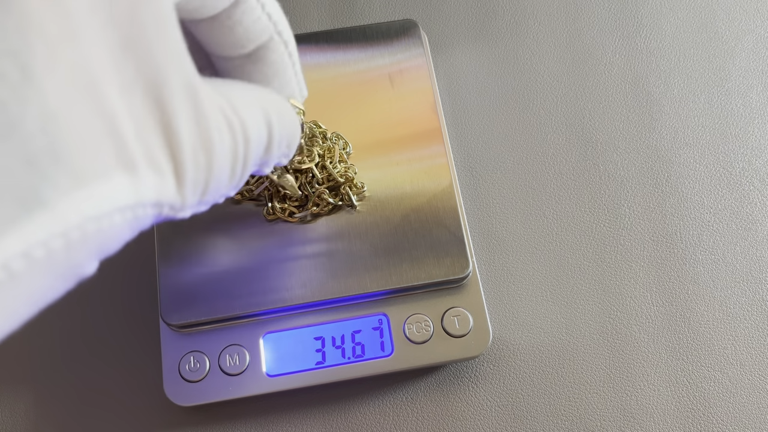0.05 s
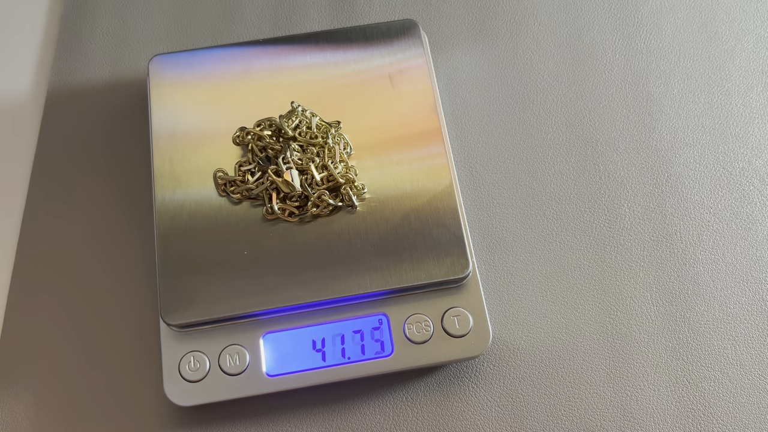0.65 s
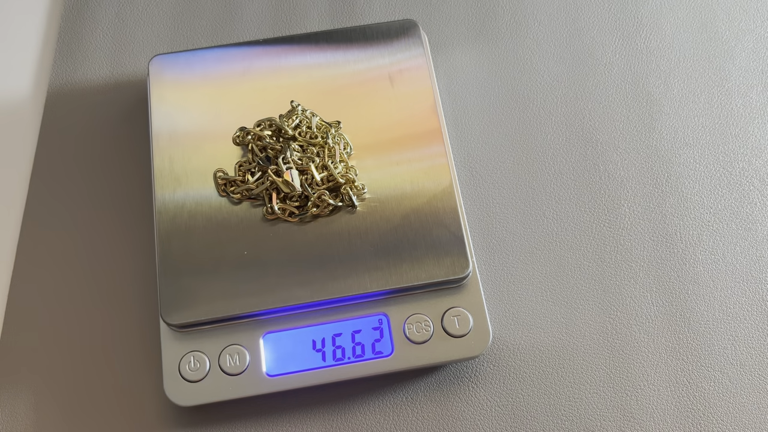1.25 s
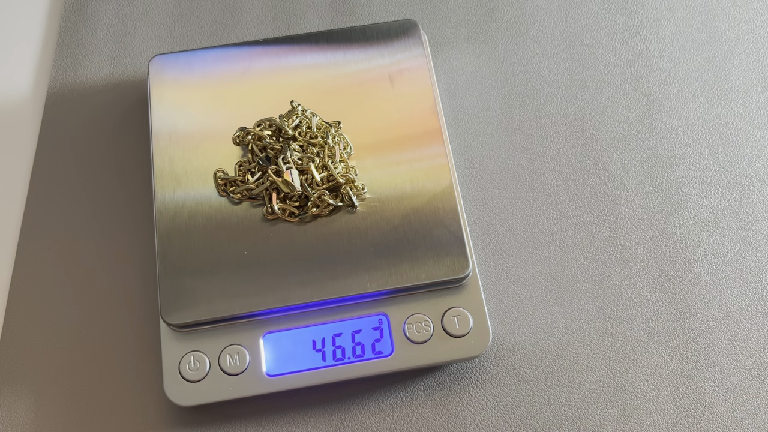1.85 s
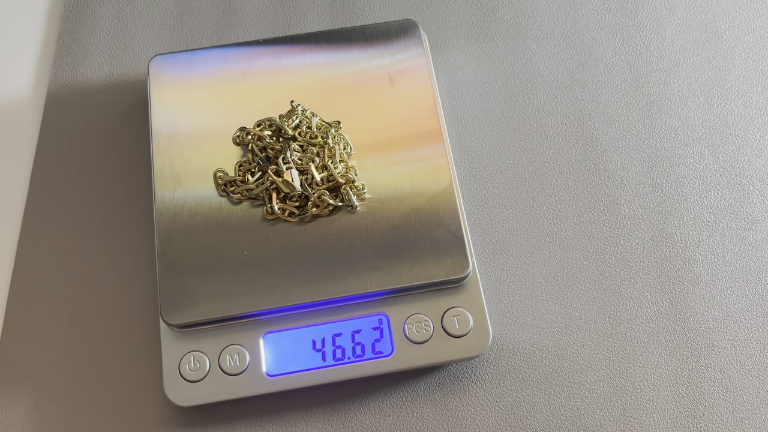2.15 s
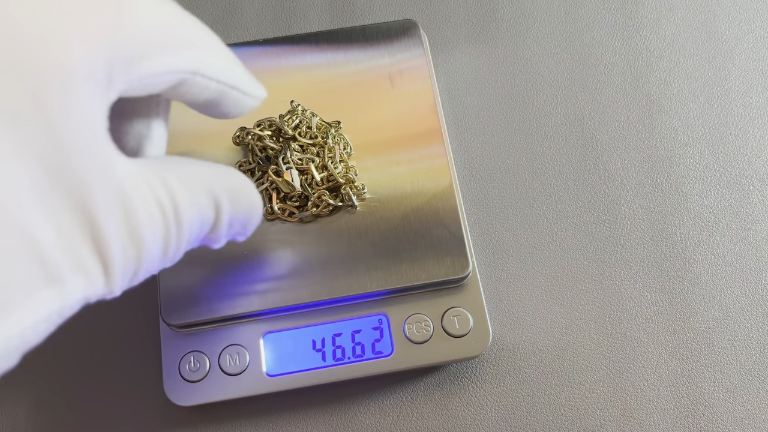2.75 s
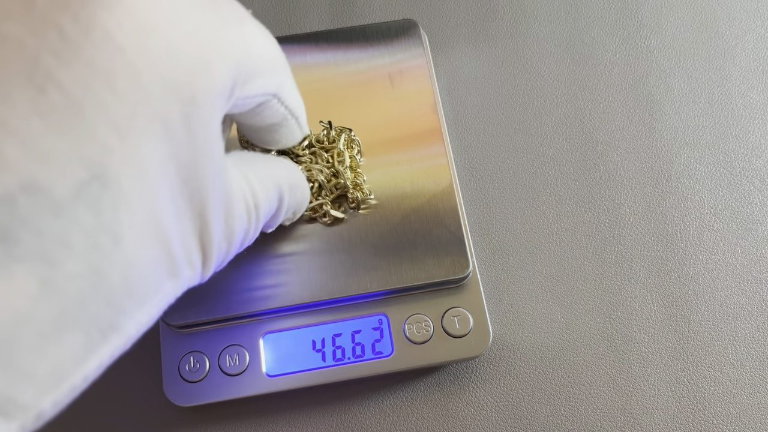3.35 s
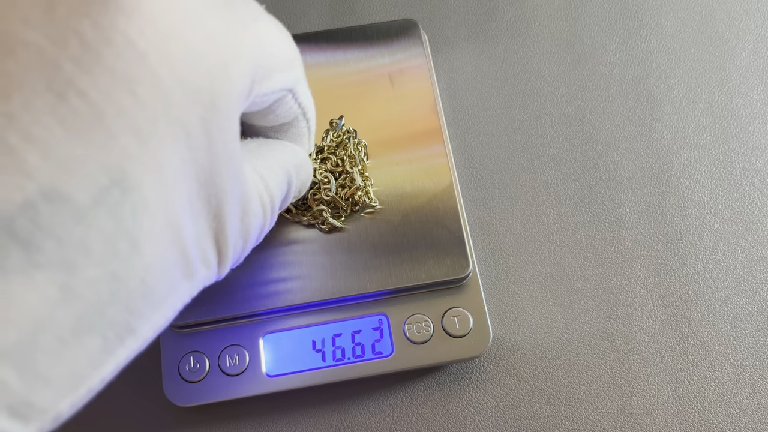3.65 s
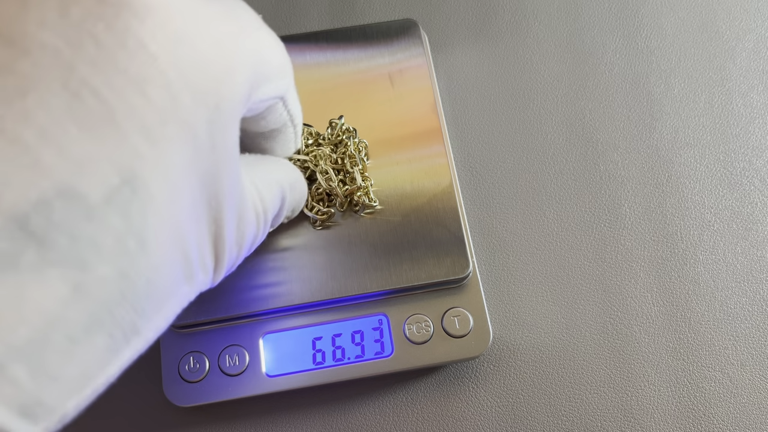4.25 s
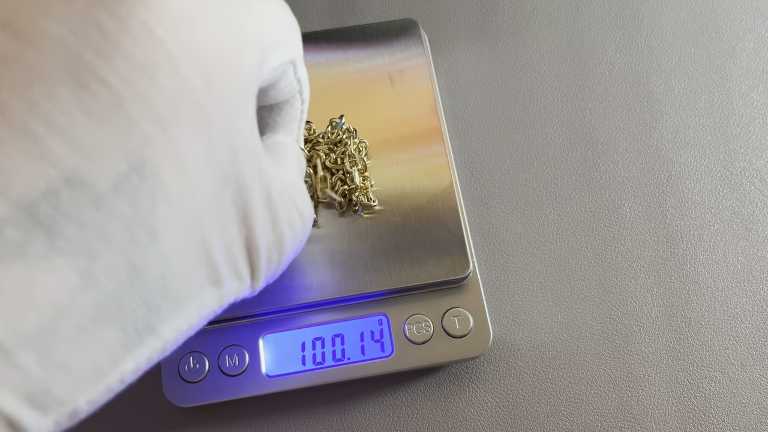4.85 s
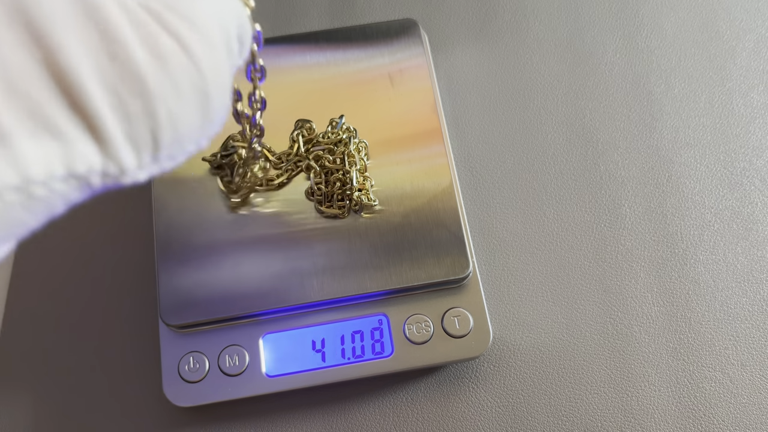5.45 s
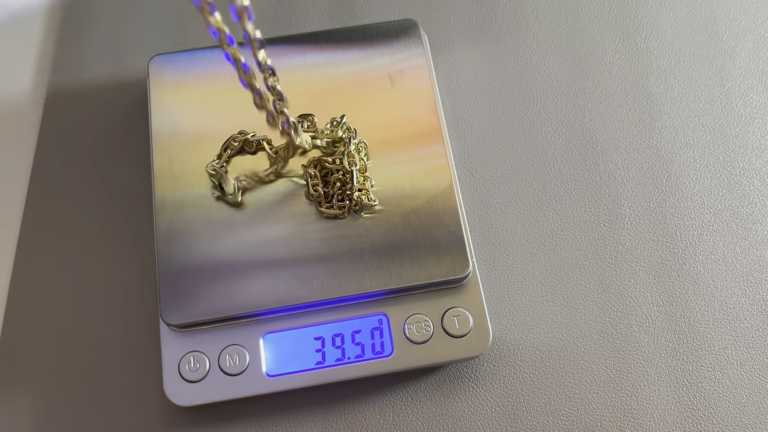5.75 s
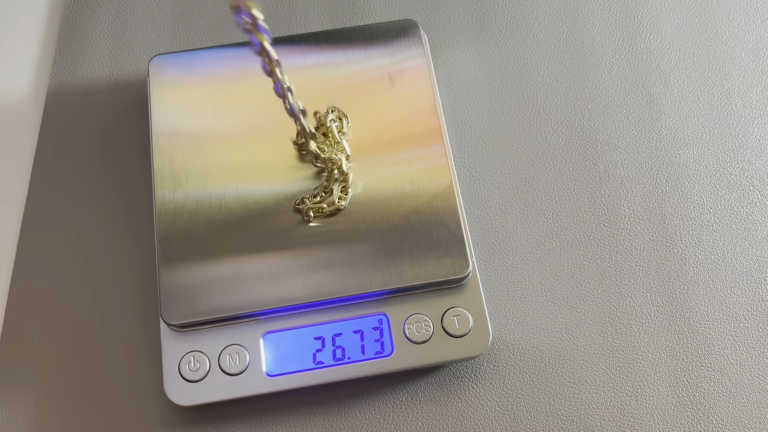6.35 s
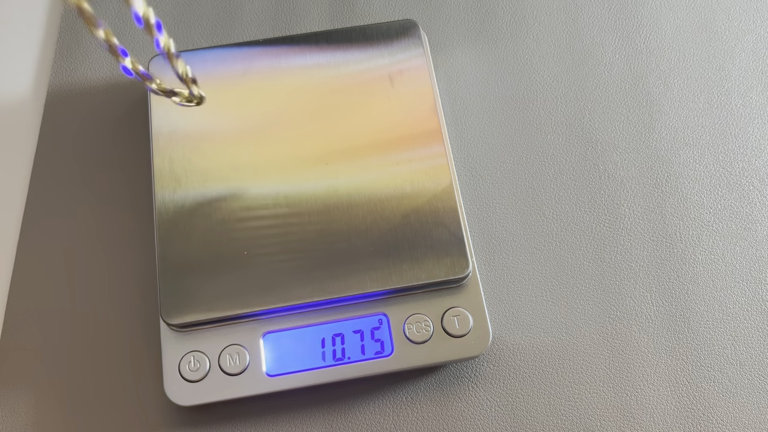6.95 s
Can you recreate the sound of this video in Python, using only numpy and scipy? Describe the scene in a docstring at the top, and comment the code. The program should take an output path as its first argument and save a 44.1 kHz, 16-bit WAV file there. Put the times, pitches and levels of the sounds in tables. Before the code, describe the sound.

A heavy metal chain clinks and rattles on a small steel scale, rests, then is gathered up and lifted off.

```python
"""A heavy metal chain clatters onto the steel platter of a small scale, dropped by a gloved hand.
After a pause the hand gathers it up and lifts it off. Colliding links tick and chatter, and their
impacts excite a few damped resonances of the thin platter. The desk, the hand and a small room
reflect the sound to a close pair of microphone ports, over the low hum of a machine."""
import sys
import numpy as np
from scipy import signal
from scipy.fft import rfft, irfft, next_fast_len
from scipy.io import wavfile
from scipy.ndimage import uniform_filter1d

SR = 44100
rng = np.random.default_rng(int(sys.argv[2]) if len(sys.argv) > 2 else 0)


def waveform_to_disk(signal):
    """Save audio, clipped to [-1, 1], as 16-bit WAV at the path in sys.argv[1]."""
    frames = np.transpose(np.atleast_2d(signal))
    scaled = np.clip(frames, -1, 1) * 32767
    samples = np.round(scaled).astype(np.int16)
    wavfile.write(sys.argv[1], SR, samples)


N = 317961


def hard_knocks():
    """Impact excitation: clumps of links land hard on the heap and the platter."""
    # landings, levels before the trims: (time [s], clang [dB], thud [dB], tick [dB])
    landings = [(0.103, -49.5, -61, -61), (0.2154, -35.5, -43.5, -41.5), (0.261, -28, -45, -34.5),
                (0.2936, -30, -40, -37), (0.3288, -20.5, -27, -28.5), (0.3437, -19.5, -27.5, -31.5),
                (0.376, -21, -29.5, -32), (0.3982, -21, -34, -31), (0.4437, -33.5, -45, -38.5),
                (0.4733, -46, -50, -47), (0.5175, -34.5, -43, -39), (0.5305, -30, -43, -35),
                (0.6833, -53, -61, -64), (3.0804, -55, -55, -54), (3.253, -54, -49, -47),
                (3.4028, -43, -46, -38), (3.5254, -33.5, -46, -45.5), (3.6686, -57, -74, -63.5),
                (3.7466, -27.5, -42.5, -36), (3.7868, -25, -42, -31.5), (3.8138, -31, -50.5, -37.5),
                (4.0531, -45, -48, -41.5), (4.0873, -34, -63, -35.5), (4.139, -33, -52, -36.5),
                (4.1634, -36, -40.5, -37), (4.259, -15, -35, -27.5), (4.505, -33, -45.5, -36.5),
                (4.5505, -28.5, -45, -41), (4.573, -24, -37.5, -36), (4.82, -21, -32.5, -38),
                (4.9108, -21.5, -34, -39.5), (4.961, -28.5, -45, -36.5), (4.9974, -29, -30.5, -33.5),
                (5.0195, -16.5, -26, -37), (5.035, -9.5, -28, -30.5), (5.1211, -18.5, -29.5, -36),
                (5.1635, -22, -30, -34), (5.1962, -26.5, -38, -38), (5.2716, -35, -52, -42),
                (5.3168, -32.5, -51, -48.5), (5.3835, -41, -48, -41.5), (5.4293, -30, -44, -43.5),
                (5.4916, -33.5, -42.5, -43), (5.53, -23, -32.5, -43), (5.5422, -30, -38, -37),
                (5.5648, -17.5, -24.5, -36), (5.5804, -28, -40, -42), (5.6307, -29, -38, -34.5),
                (5.6373, -26.5, -33.5, -39), (5.6675, -31, -37, -40), (5.6853, -23, -27, -43),
                (5.7684, -36.5, -34, -45.5), (5.7857, -25, -30.5, -37), (5.8217, -31, -37, -38),
                (5.894, -26, -35.5, -53.5), (5.9277, -20.5, -27.5, -33), (5.9494, -32, -33, -36),
                (6.0472, -25, -31.5, -37.5), (6.0917, -29.5, -36.5, -42), (6.1191, -23.5, -30, -34.5),
                (6.1722, -34.5, -34.5, -37), (6.2025, -29.5, -37.5, -34), (6.336, -29.5, -35, -35),
                (6.3865, -29, -25.5, -26), (6.4228, -15.5, -29, -32), (6.4714, -27.5, -41, -39),
                (6.52, -25.5, -39, -34), (6.5322, -27.5, -29.5, -29), (6.5957, -32, -38, -30),
                (6.668, -42, -39, -36)]
    return impacts(landings, rise_s=0.0011, clang_db=13.5, thud_db=19.5, tick_db=26.5)


def light_knocks(per_s=38, over_rubbing_db=15.5, spread_db=3.5, count=600):
    """Random impacts: single links land with a strength that follows the chain's motion."""
    when, chance = rng.random((count, 2)).T
    times = when * N / SR
    levels = motion_db(times)[:, None] + over_rubbing_db + spread_db * rng.standard_normal((count, 3))
    landings = np.column_stack([times, levels])[chance < per_s * N / SR / count]
    return impacts(landings, rise_s=0.00045, clang_db=2, thud_db=-5, tick_db=-1.5)


def impacts(landings, rise_s, clang_db, thud_db, tick_db, softness=1.6, size=600, count=600):
    """Convolution: each landing is a burst of micro-impacts that drives platter and link."""
    out = np.zeros(N)
    tick, thud, clang = impulse_responses()
    u = np.arange(size) / SR / rise_s
    for (s, *levels), grit in zip(landings, rng.choice([-1., 1.], (count, size))):
        force = grit * (u * np.exp(-u)) ** softness  # peaks at u = 1
        for response, db, trim_db in zip((clang, thud, tick), levels, (clang_db, thud_db, tick_db)):
            add(out, s, amp(db + trim_db) * unit(np.convolve(force, response)))
    return out


def impulse_responses(low_hz=680, valley_hz=1550, top_hz=6000, size=1024):
    """Modal response to a blow: the link's tick, the platter's lowest mode (thud), its others (clang)."""
    # damped platter modes, lowest first: (frequency [Hz], bandwidth [Hz], relative level [dB])
    platter_modes = [(1112, 363, 0), (1796, 154, 4.5), (2567, 170, -3), (2860, 150, -2), (3780, 320, -13.5),
                     (4788, 267, 3)]
    # spectrum of one link hitting another: (frequency [Hz], relative level [dB])
    link_spectrum = [(300, -53), (700, -23.5), (1500, -28.5), (3000, -1), (4200, -4), (5000, 9), (5900, 1),
                     (6700, -0.5), (7700, -1), (8300, -3.5), (9200, -1), (11000, -5), (13000, -4.5),
                     (15800, -9.5)]
    hz = np.fft.rfftfreq(2 * size, 1 / SR)
    modes = [amp(db) / np.sqrt(1 + (2 * (hz - f) / width) ** 2) for f, width, db in platter_modes]
    radiated = hz ** 4 / (hz ** 4 + low_hz ** 4)  # a small plate radiates no bass
    below = 1 / np.sqrt(1 + (hz / valley_hz) ** 12)  # neighbouring modes cancel between their peaks
    follows = 1 / np.sqrt(1 + (hz / top_hz) ** 8)  # the platter is too heavy to follow the top treble
    thud = radiated * below * modes[0]
    clang = (1 - below) * follows * np.sqrt(sum(mode ** 2 for mode in modes[1:]))
    return causal(amp(read(link_spectrum, hz))), causal(thud), causal(clang)


def rattle(tick_db=-1, thud_db=-3, clang_db=-2, shared=0.73, drag_slope=0.84):
    """Sliding friction: links rub in the heap, and many of their contacts also drive the platter."""
    t = np.arange(N) / SR
    rubbing_db = motion_db(t) + clumps_db(t)
    dragging_db = -48 + drag_slope * (rubbing_db + 40)  # follows the rubbing, less steeply
    between = contacts(per_s=600, spread_db=2)
    beneath = shared * between + np.sqrt(1 - shared ** 2) * contacts(per_s=400, spread_db=7)
    tick, thud, clang = impulse_responses()
    links = signal.oaconvolve(between * amp(rubbing_db), amp(tick_db) * tick)
    platter = signal.oaconvolve(beneath * amp(dragging_db), amp(thud_db) * thud + amp(clang_db) * clang)
    return (links + platter)[:N]


def motion_db(t, swell_db=16, settle_db_per_s=324, creep_db=-17.5, creep_db_per_s=142):
    """Envelope of the friction: each stir swells, holds and settles as a few links creep; then the lift."""
    # finger pushes that stir the heap: (start [s], swell [s], hold [s], rubbing level [dB])
    stirs = [(-0.015, 0.047, 0.096, -64.5), (0.189, 0.054, 0.008, -35.5), (0.289, .02, 0.098, -39.5),
             (.443, 0.0037, 0.0086, -44.5), (0.504, 0.02, 0.018, -38.5), (0.565, .005, 0.012, -47.5),
             (3.07, 0.011, .07, -54.5), (3.182, 0.082, 0.16, -48), (3.437, 0.038, 0.0066, -35.5),
             (3.704, 0.024, 0.1, -56), (3.869, 0.1, 0.11, -46), (4.11, 0.047, 0.014, -39),
             (4.184, .01, 0.1, -44.5), (4.418, 0.013, 0.0051, -45), (4.499, 0.0035, 0.0039, -48.5),
             (4.562, 0.013, 0.0032, -47), (4.704, 0.078, 0.26, -42.5), (4.976, 0.036, 0.046, -32),
             (5.078, 0.016, 0.11, -42.5)]
    # the chain unwinds upward until its end leaves the platter: (time [s], rubbing level [dB])
    lift = [(5.22, -51.5), (5.35, -53.5), (5.55, -39.5), (5.95, -39), (6.2, -35), (6.27, -42), (6.33, -30),
            (6.46, -35), (6.5, -47), (6.53, -35), (6.68, -41.5), (6.77, -49), (6.8, -66.5), (6.88, -88)]
    level = np.interp(t, *np.transpose(lift), left=-np.inf, right=-np.inf)
    for start, swell, hold, db in stirs:
        to_go = np.clip(1 - (t - start) / swell, 0, 1)
        after = np.maximum(t - start - swell - hold, 0)
        settling = np.maximum(-settle_db_per_s * after, creep_db - creep_db_per_s * after)
        level = np.maximum(level, np.where(t >= start, db - swell_db * to_go + settling, -np.inf))
    return level


def clumps_db(t, turns_per_s=60, spread_db=4.5, count=2000):
    """Stick-slip: links catch and let go in clumps, so the rubbing surges and lulls at random."""
    surges = np.clip(rng.standard_normal(count), -2, 1)
    return spread_db * np.interp(t * turns_per_s, np.arange(count), surges)


def contacts(per_s, spread_db, rise_s=0.00099, count=12000, size=240):
    """Shot noise: brief random chatters of uneven strength add up to a force, held at steady power."""
    when, chance, rank = rng.random((count, 3)).T
    occurs = chance < per_s * N / SR / count
    strength = amp(spread_db * np.minimum(-np.log(rank), 3)) * occurs
    u = np.arange(size) / SR / rise_s
    chatter = rng.standard_normal((count, size)) * u * np.exp(-u) * strength[:, None]
    at = (when * N).astype(int)[:, None] + np.arange(size)
    force = np.bincount(at.ravel(), chatter.ravel(), N)[:N]
    power = np.abs(uniform_filter1d(force ** 2, SR // 40))
    return force / np.sqrt(power + 1e-9)


def ringing(x, gain_db=7):
    """Resonance: a little of every blow lingers in the lightly damped modes of the metal."""
    # narrow modes of platter and links: (frequency [Hz], relative level [dB], 60 dB decay time [s])
    narrow_modes = [(640, -17, .1), (758, -18, .12), (826, -17, .14), (1012, -15, .12), (1091, -12, .14),
                    (1872, -21, .1), (2780, -14, .1), (3213, -14, .08), (4836, -15, .08), (5115, -16, .08),
                    (7861, -14, .06), (8857, -16, .06)]
    out = np.zeros(N)
    for hz, db, t60 in narrow_modes:
        radius = 10 ** (-3 / (t60 * SR))
        pole = radius * np.exp(2j * np.pi * hz / SR)
        out += amp(db + gain_db) * 2 * signal.lfilter([1 - radius], [1, -pole], x).real
    return out


def shimmer(start_s=6.78, level_db=-77, fade_db_per_s=20, hz=4720, width_hz=600):
    """Weakly driven resonance: the hanging links barely touch and sound only their bright ring."""
    age = np.arange(N) / SR - start_s
    ring = signal.lfilter(*signal.iirpeak(hz, hz / width_hz, SR), contacts(per_s=500, spread_db=-2))
    return evened(ring) * (age > 0) * amp(level_db - fade_db_per_s * np.maximum(age, 0))


def glove(peak_s=2.35, half_length_s=0.19, level_db=-90):
    """Friction noise: cloth swishes once, faintly, as the hand nears the scale."""
    swell = np.exp(-((np.arange(N) / SR - peak_s) / half_length_s) ** 2)
    return amp(level_db) * swell * noise_band(hz=4020, width_hz=1800)


def reflections(x, first_s, t60, damping_hz=19000, turns_per_s=1.7):
    """Multipath echoes whose treble dies first; the paths change as chain and hand move."""
    out = np.zeros(N)
    angle = 2 * np.pi * turns_per_s * np.arange(N) / SR
    lag = np.arange(SR // 2) / SR
    for weight in (np.cos(angle), np.sin(angle)):  # crossfade between two sets of paths
        taps = rng.choice([-1., 1.], len(lag)) * np.clip(lag / first_s - 1, 0, 1)
        hz, t, spectra = signal.stft(taps, SR, nperseg=128)
        fade = np.exp(-np.log(1000) * t / t60 * (1 + hz[:, None] / damping_hz))
        response = unit(signal.istft(spectra * fade, SR, nperseg=128)[1])
        out += signal.oaconvolve(x * weight, response)[:N]
    return out


def ports(x):
    """Path difference: near sound reaches the left port slightly early, and each port colours it."""
    # lead of the left port over the right: (frequency [Hz], phase [rad])
    phase_lead = [(0, 0), (500, -.5), (1000, -.45), (2050, .45), (2400, 2.0), (2800, 1.3), (3000, 2.5),
                  (3400, 1.7), (4400, 2.2), (4800, 1.75), (5300, 2.3), (5900, 3.2), (7700, 6.1),
                  (10300, 9.4), (12400, 12.5), (14700, 15.6), (16100, 16.4)]
    # left port minus right: (frequency [Hz], level [dB])
    balance = [(500, -1.5), (1050, -3), (1700, 1), (2500, -1.5), (3000, -3.5), (4800, -3), (5600, 0),
               (16000, 0)]
    size = next_fast_len(N + SR // 10)
    hz = np.fft.rfftfreq(size, 1 / SR)
    phase = np.interp(hz, *np.transpose(phase_lead))
    left = amp(read(balance, hz) / 2) * np.exp(.5j * phase)
    return irfft(rfft(x, size) * np.array([left, 1 / left]), size)[:, :N]


def background(rumble_hz=450):
    """Time-varying gain: the recorder holds the bass of steady air and hum down for about a second."""
    # the recorder's gain on rumble and hum: (time [s], gain [dB])
    bass_gain = [(0, -13), (.8, -10.5), (1.05, -9), (1.3, -2.5), (7.2, -2)]
    t, hz = np.arange(N) / SR, np.fft.rfftfreq(N, 1 / SR)
    air = room_air(hz)
    rumble = irfft(rfft(air) / (1 + (hz / rumble_hz) ** 4), N)
    return air - rumble + (rumble + hum(t)) * amp(np.interp(t, *np.transpose(bass_gain)))


def room_air(hz, level_db=-57.5):
    """Partial coherence: the room's noise is alike at both ports in the bass, less so higher up."""
    # noise spectrum of the air: (frequency [Hz], relative density [dB])
    spectrum = [(25, -30), (40, -15), (56, -3), (80, -5), (110, -1.5), (170, -10), (230, -8), (330, -16),
                (700, -27), (1500, -27.5), (2200, -42), (4500, -48), (7000, -56), (16000, -61)]
    # likeness of the air at the two ports: (frequency [Hz], correlation [-1 to 1])
    correlation = [(60, 1), (180, 0.92), (550, 0.28), (1650, -0.46), (4970, -0.21), (15000, 0.17)]
    left, independent = rfft(rng.standard_normal((2, N)))
    same = read(correlation, hz)
    right = same * left + np.sqrt(1 - same ** 2) * independent
    return amp(level_db) * evened(irfft(np.array([left, right]) * amp(read(spectrum, hz)), N))


def hum(t, waver=0.41):
    """Slow random modulation: the tones of a machine in the room waver in amplitude and phase."""
    # machine tones: (frequency [Hz], rms level before waver and bass gain [dB])
    tones = [(60, -67.5), (102.5, -66), (150.3, -65), (205.5, -64), (263, -75.5), (899, -89.5)]
    knots = np.linspace(0, t[-1], num=40)
    out = np.zeros(N)
    for hz, db in tones:
        depth, drift = (waver * np.interp(t, knots, row) for row in rng.standard_normal((2, len(knots))))
        out += amp(db) * np.sqrt(2) * (1 + depth) * np.sin(2 * np.pi * hz * t + 2 * drift)
    return out


def whine():
    """Narrow-band noise: the machine's faint, wavering whine."""
    # bands of the whine: (centre [Hz], width [Hz], rms level [dB])
    bands = [(1453, 30, -81.5), (1830, 210, -84)]
    return sum(amp(db) * noise_band(hz, width) for hz, width, db in bands)


def noise_band(hz, width_hz):
    """Noise in one Gaussian band, independent at each port, rms 1."""
    bell = np.exp(-2 * ((np.fft.rfftfreq(N, 1 / SR) - hz) / width_hz) ** 2)
    return evened(irfft(rfft(rng.standard_normal((2, N))) * bell, N))


def causal(gain, size=1024):
    """Minimum phase: a sharp-fronted impulse response with the given spectral shape, energy 1."""
    cepstrum = irfft(np.log(np.maximum(gain / gain.max(), 1e-5)))
    cepstrum[1:size] *= 2
    cepstrum[size + 1:] = 0
    return unit(irfft(np.exp(rfft(cepstrum)))[:size])


def amp(db):
    """Decibels to gain."""
    return 10 ** (np.asarray(db) / 20)


def evened(x):
    """Scales to rms 1."""
    return x / np.sqrt(np.mean(x ** 2) + 1e-20)


def unit(x):
    """Scales to energy 1."""
    return x / (np.linalg.norm(x) + 1e-20)


def read(points, hz):
    """Interpolates a table on a log-frequency axis."""
    f, value = np.transpose(points)
    return np.interp(np.log(hz + 1), np.log(f + 1), value)


def add(mix, s, sound):
    """Lays a sound into the mix at time s."""
    part = mix[max(round(s * SR), 0):][:len(sound)]
    part += sound[:len(part)]


def scene(desk_db=-13, scatter_db=-15, room_db=-15):
    """Superposition: the chain heard directly, off the desk, scattered by the hand and in the room."""
    chain = hard_knocks() + light_knocks() + rattle() + shimmer()
    chain = chain + ringing(chain)
    near = ports(chain + amp(desk_db) * reflections(chain, first_s=0.001, t60=0.07))
    scattered = np.array([reflections(chain, first_s=0.00025, t60=0.11) for _ in range(2)])
    diffuse = np.array([reflections(chain, first_s=0.0006, t60=0.21) for _ in range(2)])
    ambience = background() + whine()
    return near + amp(scatter_db) * scattered + amp(room_db) * diffuse + glove() + ambience


def record(dry, cutoff_hz=16000):
    """Band limiting: a steep low-pass filter removes the highest treble."""
    lowpass = signal.firwin(511, cutoff_hz, window=("kaiser", 9), fs=SR)
    return signal.oaconvolve(dry, lowpass[None], "same")


dry = scene()
out = record(dry)
waveform_to_disk(out)
```